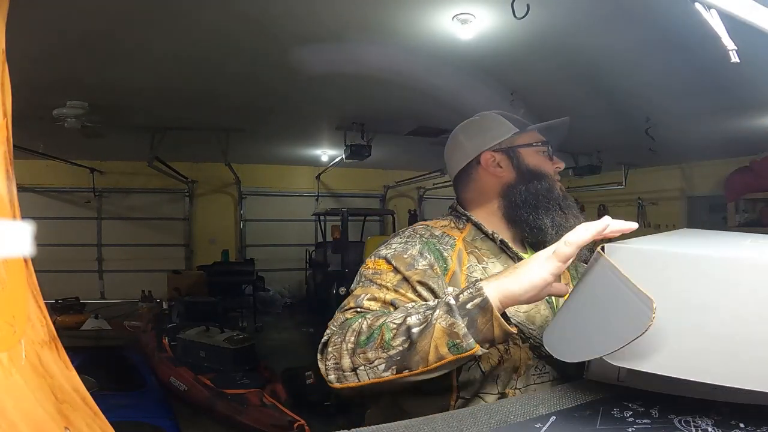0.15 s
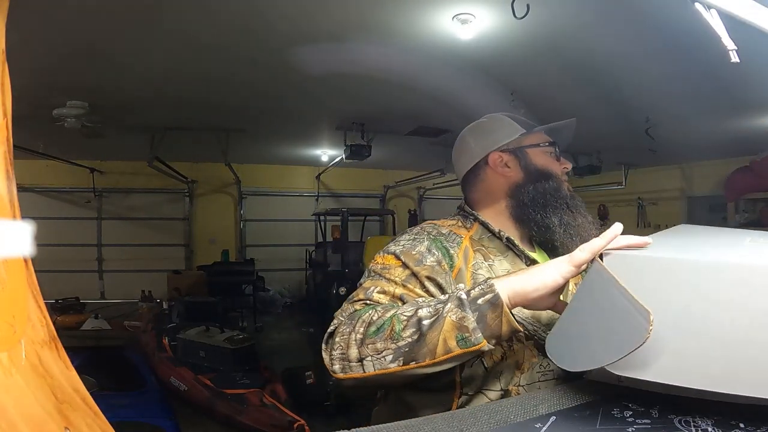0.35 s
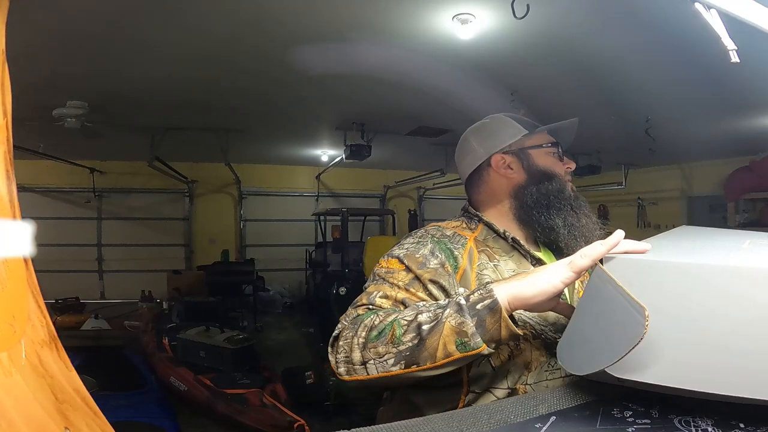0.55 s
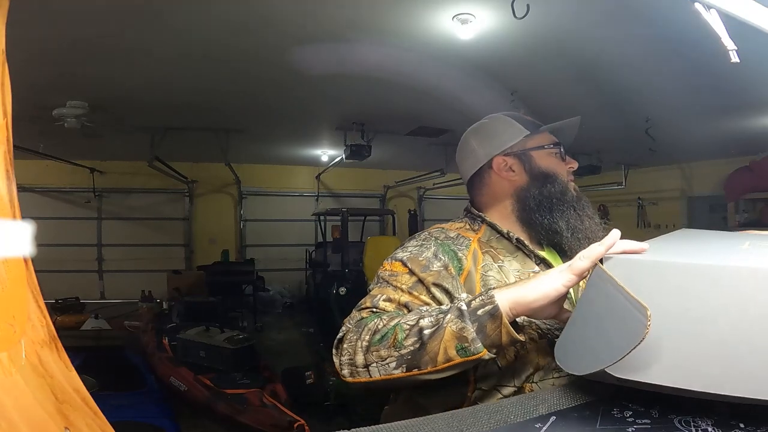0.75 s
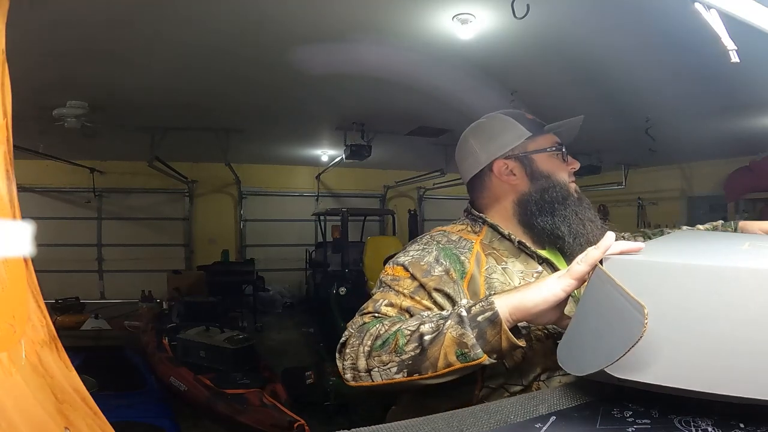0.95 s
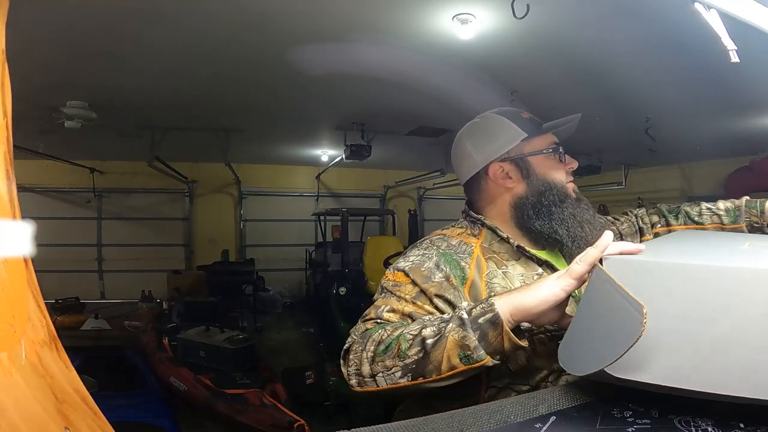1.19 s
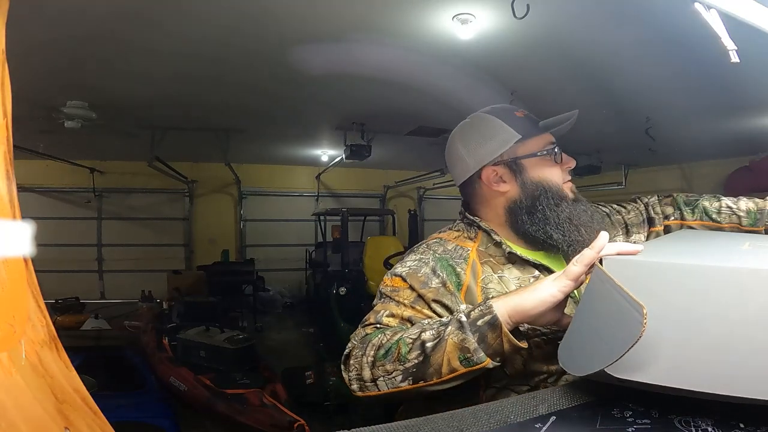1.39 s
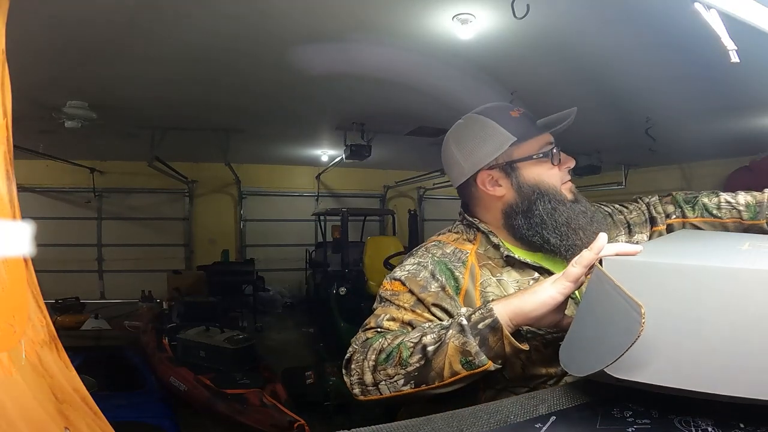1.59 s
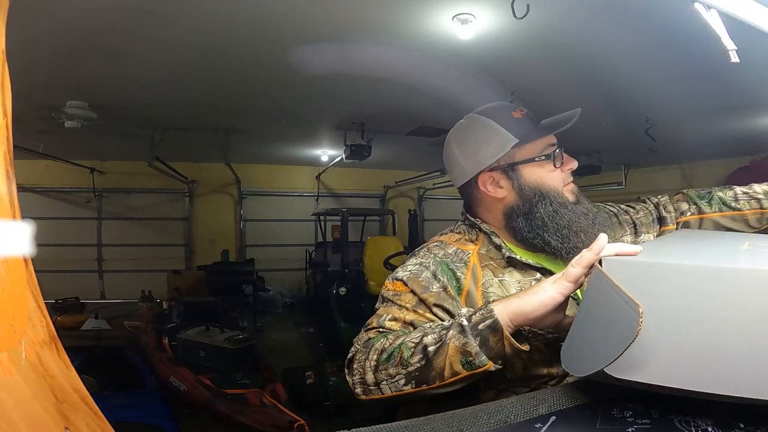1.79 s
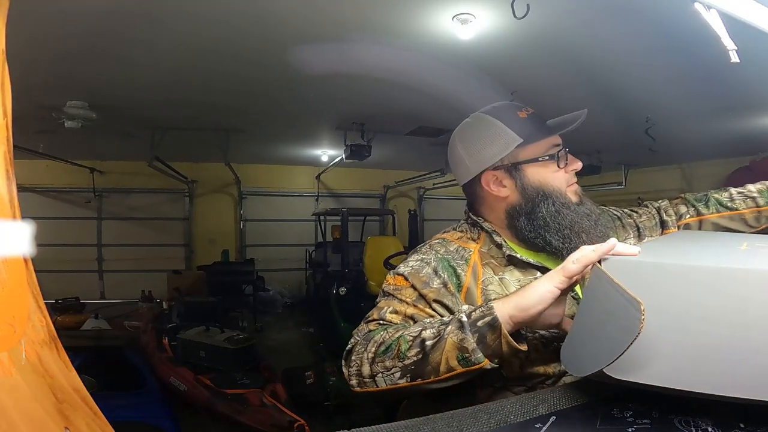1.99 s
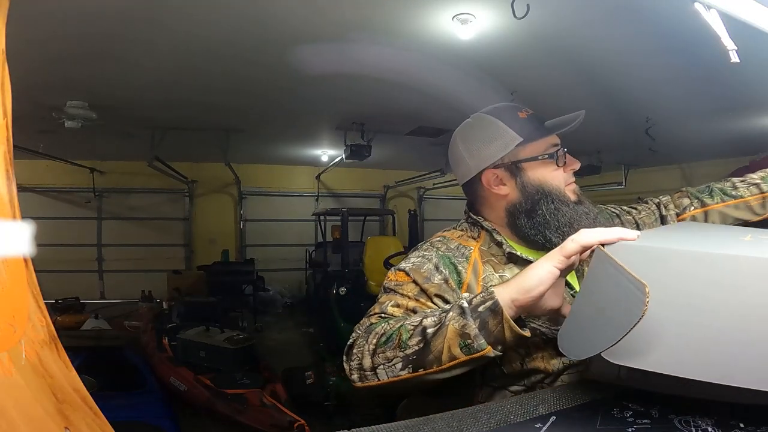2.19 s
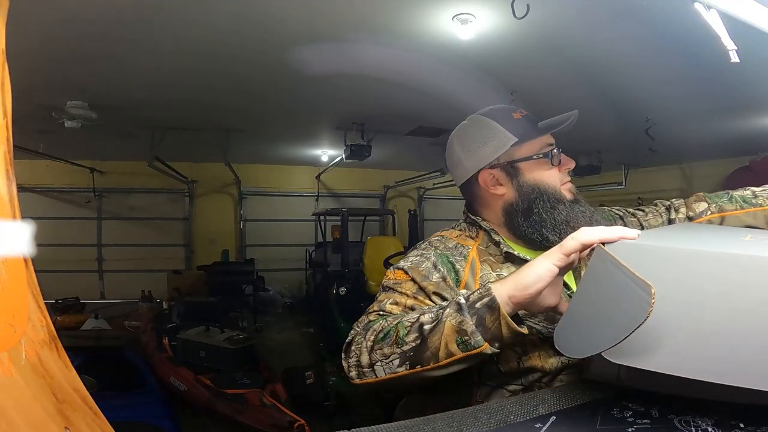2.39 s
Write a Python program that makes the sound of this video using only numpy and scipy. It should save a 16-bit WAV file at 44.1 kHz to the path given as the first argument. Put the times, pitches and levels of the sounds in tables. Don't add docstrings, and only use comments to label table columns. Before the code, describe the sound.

Cardboard box lid flap scrapes and knocks hollowly as hands fold it shut in a garage

```python
import sys
import numpy as np
from scipy import signal
from scipy.fft import rfft, irfft, next_fast_len
from scipy.io import wavfile
from scipy.ndimage import uniform_filter1d, map_coordinates

SR = 44100
rng = np.random.default_rng(int(sys.argv[2]) if len(sys.argv) > 2 else 0)


def boost_factor(decibels):
    exponent = np.asarray(decibels, float) / 20
    return 10 ** exponent


def transcribe(signal):
    frames = np.atleast_2d(signal).T
    limited = np.clip(frames, -1, 1)
    pcm = np.round(limited * 32767).astype(np.int16)
    wavfile.write(sys.argv[1], SR, pcm)


N = 108045

# f/Hz, level/dB
RUMBLE_SPECTRUM = [(12, -49), (20, -2.5), (60, -1), (87, -1), (114, -0.5), (226, -4), (284, -10.5),
                   (362, -10), (500, -36), (650, -61), (1100, -120)]
# t/s, level/dB
BENCH_LEVEL = [(0, -42), (.5, -44), (1.0, -46), (2.2, -42.5), (2.45, -50)]
# t/s, level/dB
HAND_LEVEL = [(0, -44), (.17, -56.5), (.25, -49), (.53, -55), (.72, -50.5), (1.0, -55), (1.12, -53.5),
              (1.3, -55), (1.7, -54.5), (1.89, -53.5), (2.28, -49.5), (2.37, -56), (2.45, -52)]
# f/Hz, level/dB
RUSTLE_SPECTRUM = [(300, -8), (640, -8.5), (1500, -15.5), (5000, -26.5), (8800, -35.5), (11800, -43.5),
                   (14000, -51), (16000, -71)]
# t/s, length/s, level/dB
SLEEVE_SWELLS = [
    (1.135, 0.27, -70.5),
    (1.44, 0.042, -68),
    (2.04, 0.034, -49),
    (2.37, 0.1, -78),
]
# t/s, length/s, f/Hz, level/dB
RUBS = [(0.375, 0.03, 640, -47), (0.892, 0.013, 1900, -39), (1.049, 0.052, 338, -40.5),
        (1.056, 0.034, 1320, -51.5), (1.307, 0.049, 1040, -48), (1.48, 0.032, 1414, -53),
        (1.69, 0.035, 994, -54.5), (1.92, 0.075, 1200, -52), (1.947, 0.047, 1420, -49),
        (2.152, 0.095, 227, -32.5), (2.182, 0.054, 674, -32.5), (2.25, 0.053, 320.5, -37.5)]
# t/s, peak level/dB, bright edge level/dB
TICKS = [(0.1997, -20.5, 5), (0.2714, -39, 3), (0.395, -40, 1), (0.4675, -38, 9), (.7761, -35, -6),
         (.8116, -40, 3), (.85, -39, -6), (.8759, -30, -2), (.9063, -26, -12), (.9398, -21, -5),
         (0.9450, -23.5, 0), (0.9747, -27, 1), (1.1947, -49, 13), (1.234, -44, -5), (1.2807, -35.5, 2.5),
         (1.3106, -41, -10), (1.3688, -37.5, -4), (1.4068, -44, 3), (1.4531, -38.5, -2),
         (1.486, -39.5, -13), (1.5301, -41, 8.5), (1.5671, -29.5, 3), (1.5805, -25, 5), (1.5882, -25, 0.5),
         (1.6016, -22, -4), (1.6118, -23, -13), (1.6196, -23.5, -0.5), (1.716, -39.5, 3), (1.7681, -48, 5),
         (1.838, -38, 0), (1.891, -51, -12), (1.917, -26.5, 2), (1.949, -38, -7), (2.039, -32, -4),
         (2.1036, -25.5, -15), (2.1465, -26, -7), (2.2618, -38, -12)]
# f/Hz, level/dB
SNAP_SPECTRUM = [(530, 10), (900, 9.5), (4150, 3.5), (7230, -7.5), (9880, -9), (12900, -12), (14900, -41),
                 (16000, -62)]
# t/s, peak level/dB, struck region f/Hz
BUMPS = [(0.217, -20.5, 70), (0.864, -40, 68.3), (0.919, -29, 48.5), (1.086, -30.5, 50), (1.032, -36.5, 70),
         (1.05, -27.5, 150), (1.195, -34, 208), (1.319, -33.5, 200), (1.37, -28, 213), (1.442, -30, 346),
         (1.471, -36, 156), (1.601, -32.5, 186), (1.622, -41.5, 164), (1.694, -43, 165),
         (1.742, -31.5, 191), (1.894, -27, 96), (1.905, -35, 340), (1.966, -33, 105), (2.125, -31.5, 60),
         (2.244, -24, 236), (2.271, -30, 239)]
# t/s, peak level/dB, struck region f/Hz, panel ring level/dB, contact/s
KNOCKS = [(.159, -27.5, 645, 8.5, 0.011), (.2, -13.5, 187, 5.5, 0.0019), (.229, -23.5, 282, -19, 0.0023),
          (.243, -22.5, 220, -3.5, 0.0029), (.272, -27, 140, -6, 0.0018), (.293, -28.5, 182, -3, 0.003),
          (.773, -42.5, 206, 3.5, 0.0024), (.812, -40, 149, -0.5, 0.0028), (.914, -16, 208, -5.5, 0.003),
          (.938, -34, 200, -4, 0.0013), (.975, -41, 161, -23, 0.0019), (1.267, -26.5, 166, 0.5, 0.014),
          (1.772, -26, 312, -1.5, 0.002), (1.836, -40, 200, 3.5, 0.00078), (2.068, -21, 317, -12, 0.002),
          (2.085, -14.5, 268, -3.5, 0.0012), (2.104, -15.5, 273, 0, 0.0015)]
# f/Hz, level/dB, t60/s
HOLLOW_MODES = [(45, -2.5, 0.4), (70, 2, 0.38), (132.2, -2, 0.13), (160, 7.5, 0.089), (208.2, 5.5, 0.097),
                (229.6, -3.5, 0.091), (296.5, 11, 0.049), (320.5, 3.5, 0.1)]
# f/Hz, level/dB, t60/s
PANEL_MODES = [(486.4, -5, 0.041), (568.4, -1.5, 0.071), (630.3, 3, 0.061), (696, -5.5, 0.08),
               (783, -15, 0.071), (979.7, -2, 0.046), (1071, -7, 0.022), (1226, 1, 0.058),
               (1528, -19.5, 0.06), (1747, -13, 0.22)]
# f/Hz, level/dB, t60/s
FLUTE_MODES = [(1599, -1.5, 0.14), (1874, 6, 0.035), (2290, -3, 0.15), (2550, 9, 0.031), (3327, -6.5, 0.13),
               (3530, 6, 0.02), (4005, -0.5, 0.049), (4220, 6, 0.028), (4790, -2, 0.11), (5340, 4.5, 0.011),
               (6170, -13, 0.087), (6750, 0, 0.034), (7720, 0, 0.018)]
# t/s, rise/s, fall/s, pressure level/dB, panel ring over hiss/dB
STROKES = [(-.012, 0.021, 0.053, -32.5, -2.5), (0.068, 0.084, 0.1, -48, -1.5),
           (0.159, 0.014, 0.038, -48.5, -15), (0.5666, 0.0028, 0.068, -40.5, 11.5),
           (0.574, 0.046, 0.094, -30, 9), (0.659, 0.0074, 0.18, -43, 1.5), (0.734, 0.089, 0.13, -55, 6),
           (0.838, 0.064, 0.049, -42.5, -3), (.905, 0.046, 0.017, -39.5, 4.5), (.96, 0.035, 0.078, -48, -1),
           (1.039, 0.031, 0.21, -61.5, 10.5), (1.176, 0.016, 0.17, -51.5, 5),
           (1.217, 0.023, 0.31, -54, 3.5), (1.299, 0.025, 0.056, -59, 14.5),
           (1.562, 0.0076, 0.081, -43, -13), (1.581, 0.035, 0.055, -37.5, 3.5),
           (1.63, 0.012, 0.64, -54.5, -12), (1.757, 0.023, 0.05, -45, 8), (1.944, 0.076, 0.21, -48.5, 5.5),
           (2.026, 0.039, 0.072, -34.5, 11.5), (2.068, 0.042, 0.062, -33.5, 7.5),
           (2.131, 0.025, 0.08, -37.5, 10.5), (2.15, .04, 0.15, -45, 5.5), (2.171, 0.05, 0.12, -45.5, 8.5),
           (2.25, 0.022, 0.07, -48, -18)]
# f/Hz, level/dB
HISS_SPECTRUM = [(700, -17.5), (1700, -6.5), (2600, -12.5), (5500, -14.5), (8800, -28), (11500, -25),
                 (14300, -40), (16000, -49)]
# t/s, brightness/dB
EDGE_BRIGHTNESS = [(0, -16), (.1, 3), (.2, 0), (.5, 1), (.7, -0.5), (1, -1.5), (1.25, -1.5), (1.6, -7.5),
                   (1.8, 0), (2.05, -3), (2.12, -2.5), (2.3, -0.5)]
# f/Hz, t60/s
GARAGE_T60 = [(100, 0.14), (1000, 0.067), (10000, 0.11)]
# f/Hz, side over mid/dB
SIDE_LEVEL = [(40, -21), (150, -27), (350, -19.5), (700, -12), (1400, -3), (5000, -6), (14000, -4)]

RUSTLE_SWAY_DB, RUSTLE_BANDS_DB, LUMPS_DB = 1.8, 0.48, 3.2
SLEEVE_HZ, SLEEVE_WIDTH_HZ = 11550, 1800
RUB_WAVER = 0.016
TICK_T60_S, TICK_RISE_S, TICK_TRIM_DB, TICK_RING_DB = 0.031, 0.00096, -9.5, -4
CRACK_GAIN, CRACK_T60_S = 2, .009
BUMP_CONTACT_S, BUMP_RING_DB = .004, -17.5
REGION_OCT = 0.59
MODE_SCATTER_DB, DETUNE, PHASE_SCATTER_RAD = 2, .01, 0.73
HOLLOW_LAG = 1.55
SLIPS_PER_S, SLIP_SPREAD_DB, SLIP_S, SMOOTH_SHARE = 1100, 3, .002, 2.1
STUTTER_DB, SLIP_BANDS_DB = .5, 1.5
RISE_POWER, FALL_POWER = 0.81, 3.83
FLUTES_DB, BOOM_DB = -2, -14
PANEL_TOP_HZ, EDGE_HZ = 2250, 5500
ROOM_DB = -17
LEAD_SHARE, LEAD_HZ = .55, 6000
LOW_HZ, TOP_HZ, CEILING = 33.3, 16400, .7


def unit(x):
    return x / np.sqrt(np.mean(x ** 2) + 1e-20)


def along(points, hz):
    f, v = np.transpose(points)
    return np.interp(np.log(hz + 1), np.log(f + 1), v)


def curve(rows):
    s, v = np.transpose(rows)
    return np.interp(np.arange(N) / SR, s, v)


def wobble(rate):
    knots = rng.standard_normal(int(N * rate / SR) + 4)
    return map_coordinates(knots, [np.arange(N) * rate / SR])


def bump_of(s, length):
    t = np.arange(N) / SR
    return np.sin(np.pi * np.clip((t - s) / length, 0, 1))


def filtered(x, response):
    m = next_fast_len(N + SR // 2)
    return irfft(rfft(x, m) * response(np.fft.rfftfreq(m, 1 / SR)), m)[..., :N]


def above_edge(hz):
    return 1 / (1 + (EDGE_HZ / (hz + 1)) ** 4)


def colour(x, spectrum):
    gain = lambda hz: boost_factor(along(spectrum, hz))
    return filtered(x, gain) / np.sqrt(np.mean(gain(np.linspace(0, SR / 2, num=4000)) ** 2))


def banded(x, depth_db):
    z = signal.stft(x, nperseg=256)[2]
    field = uniform_filter1d(rng.standard_normal(z.shape[1:]), size=2, axis=0)
    field = uniform_filter1d(field, size=26, axis=1)
    return signal.istft(z * boost_factor(depth_db * unit(field)), nperseg=256)[1][:, :N]


def body(x, modes):
    k = np.log(1000) / np.pi

    def response(f):
        total = 0
        for i, (centre, db, t60) in enumerate(modes):
            damping = 1j * f * k / t60
            total = total + (-1) ** i * boost_factor(db) * damping / (centre * centre - f * f + damping)
        return total
    return filtered(x, response)


def ringing(x, modes):
    return body(x, modes) / body(rng.standard_normal(N), modes).std()


def bench():
    level_db = curve(BENCH_LEVEL) + LUMPS_DB * wobble(16.0)
    return boost_factor(level_db) * colour(rng.standard_normal((2, N)), RUMBLE_SPECTRUM)


def hand():
    level_db = curve(HAND_LEVEL) + RUSTLE_SWAY_DB * wobble(9.27)
    noise = banded(rng.standard_normal((2, N)), RUSTLE_BANDS_DB)
    return boost_factor(level_db) * colour(noise, RUSTLE_SPECTRUM)


def sleeve():
    swell = sum(boost_factor(db) * bump_of(s, length) for s, length, db in SLEEVE_SWELLS)
    band = lambda hz: np.exp(-((hz - SLEEVE_HZ) / SLEEVE_WIDTH_HZ) ** 2)
    return swell * unit(filtered(rng.standard_normal((2, N)), band))


def rubs():
    waver = np.cumsum(1 + RUB_WAVER * wobble(98)) / SR
    return sum(boost_factor(db) * bump_of(s, length) * np.sin(2 * np.pi * hz * waver) for s, length, hz, db in RUBS)


def ticks():
    t = np.arange(SR // 20) / SR
    out = np.zeros((2, 2, N + SR))
    decay = boost_factor(-60 * t / TICK_T60_S) + CRACK_GAIN * boost_factor(-60 * t / CRACK_T60_S)
    shape = decay * (1 - np.exp(-t / TICK_RISE_S))
    for s, db, edge_db in TICKS:
        burst = boost_factor(db + TICK_TRIM_DB) * shape * rng.standard_normal((2, len(t)))
        out[..., round(s * SR):][..., :len(t)] += burst * boost_factor([0, edge_db])[:, None, None]
    dull, bright = out[..., :N]
    snap = filtered(dull, lambda hz: 1 - above_edge(hz)) + filtered(bright, above_edge)
    return colour(snap, SNAP_SPECTRUM) + boost_factor(TICK_RING_DB) * ringing(snap, PANEL_MODES)


def knocks():
    out, t = np.zeros(N + SR), np.arange(SR // 3) / SR
    blows = KNOCKS + [(*bump, BUMP_RING_DB, BUMP_CONTACT_S) for bump in BUMPS]
    hz, db, t60 = np.transpose(HOLLOW_MODES + PANEL_MODES)
    low = len(HOLLOW_MODES)
    lag = np.where(np.arange(len(hz)) < low, HOLLOW_LAG, 1)[:, None]
    for s, peak_db, region_hz, ring_db, contact_s in blows:
        luck = rng.standard_normal(len(hz))
        near_db = -6 * (np.log2(hz / region_hz) / REGION_OCT) ** 2
        near_db[low:] = ring_db - 17 * np.log2(hz[low:] / 680) ** 2
        level_db = peak_db + db + near_db + MODE_SCATTER_DB * luck
        pitch_hz = hz * (1 + DETUNE * luck[::-1])
        phase = 2 * np.pi * pitch_hz[:, None] * t + PHASE_SCATTER_RAD * np.roll(luck, 1)[:, None]
        ring = boost_factor(level_db[:, None] - 60 * t / t60[:, None]) * np.sin(phase)
        onset = (1 - np.exp(-t / (max(contact_s, 1e-4) * lag))) ** 2
        out[round(s * SR):][:len(t)] += (ring * onset).sum(0)
    return out[:N]


def slips():
    size_db = SLIP_SPREAD_DB * np.minimum(rng.exponential(size=N), 2)
    hits = (rng.random(N) < SLIPS_PER_S / SR) * boost_factor(size_db)
    grain = np.convolve(hits, np.exp(-np.arange(300) / (SLIP_S * SR)))[:N]
    noise = banded(rng.standard_normal((2, N)), SLIP_BANDS_DB)
    return unit((unit(grain) + SMOOTH_SHARE) * boost_factor(STUTTER_DB * wobble(60.6)) * noise)


def scrape():
    t, drive = np.arange(N) / SR, np.zeros((2, N))
    for s, rise, fall, db, ring_db in STROKES:
        bite = np.clip((t - s) / rise, 0, 1) ** RISE_POWER
        release = np.clip(1 - (t - s - rise) / fall, 0, 1) ** FALL_POWER
        drive += bite * release * boost_factor([[db], [db + ring_db]])
    hiss_drive, shake_drive = drive
    force = slips()
    shake = filtered(shake_drive * force, lambda hz: 1 / (1 + 1j * hz / PANEL_TOP_HZ) ** 2)
    hiss = colour(hiss_drive * force, HISS_SPECTRUM)
    hiss = hiss + (boost_factor(curve(EDGE_BRIGHTNESS)) - 1) * filtered(hiss, above_edge)
    probe = rng.standard_normal(N)
    flute_gain = probe.std() / body(colour(probe, HISS_SPECTRUM), FLUTE_MODES).std()
    flutes = boost_factor(FLUTES_DB) * flute_gain * body(hiss, FLUTE_MODES)
    boom = boost_factor(BOOM_DB) * ringing(shake, HOLLOW_MODES)
    return hiss + flutes + ringing(shake, PANEL_MODES) + boom


def smear(x, t60s, length):
    hz, t, z = signal.stft(rng.standard_normal((2, int(length * SR))), SR, nperseg=128)
    tail = signal.istft(z * boost_factor(-60 * t / along(t60s, hz)[:, None]), SR, nperseg=128)[1]
    tail = tail / np.linalg.norm(tail, axis=1)[:, None]
    return signal.fftconvolve(x, tail, axes=1)[:, :N]


def scene():
    box = bench() + hand() + sleeve() + rubs() + ticks() + knocks() + scrape()
    delayed = np.pad(box, ((0, 0), (500, 0)))
    pair = box + boost_factor(ROOM_DB) * smear(delayed, GARAGE_T60, 0.36)
    tied = lambda hz: LEAD_SHARE / (1 + hz / LEAD_HZ)
    spread = lambda hz: -1j * boost_factor(along(SIDE_LEVEL, hz)) * np.sqrt([tied(hz), 1 - tied(hz)])
    side = filtered(pair, spread).sum(0)
    return np.array([pair[0] + side, pair[0] - side]) * boost_factor([[-.1], [.1]])


def low_pass(x):
    return signal.sosfilt(signal.butter(12, 16430, fs=SR, output="sos"), x)


def record(dry):
    x = filtered(dry, lambda hz: (hz < TOP_HZ) / (1 + (LOW_HZ / (hz + 1)) ** 2))
    mix = x / np.sqrt(np.sqrt(1 + (x / CEILING) ** 4))
    return low_pass(mix)


dry = scene()
out = record(dry)
transcribe(out)
```